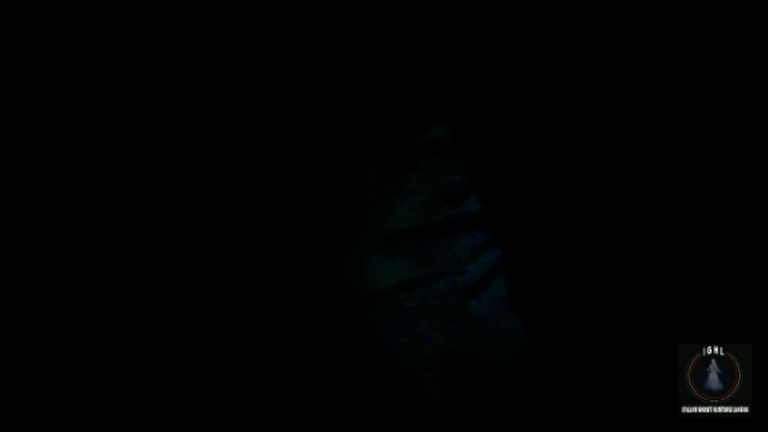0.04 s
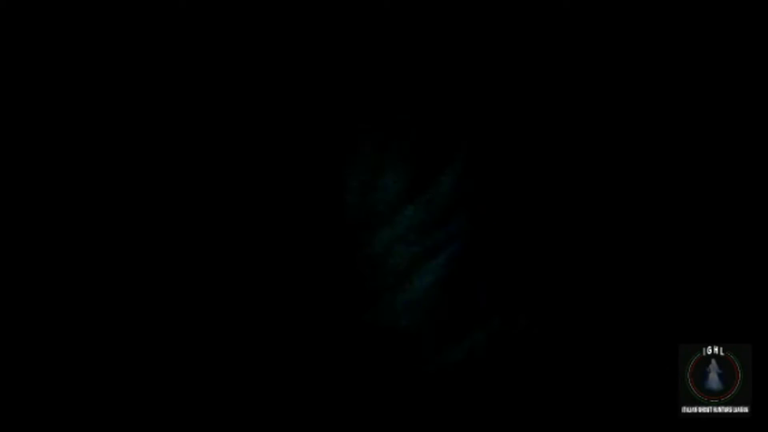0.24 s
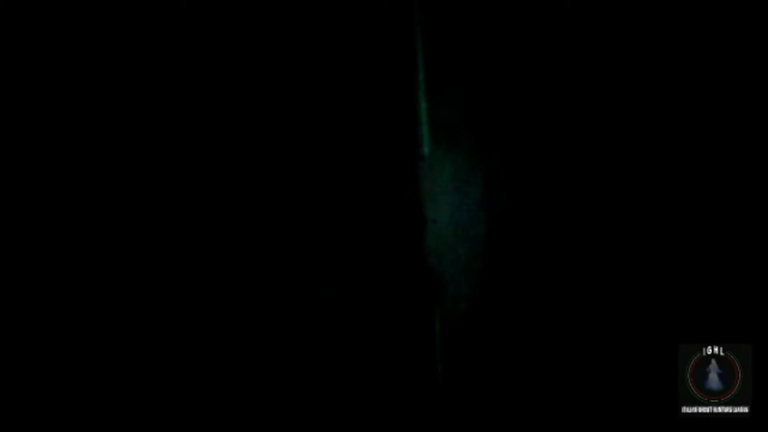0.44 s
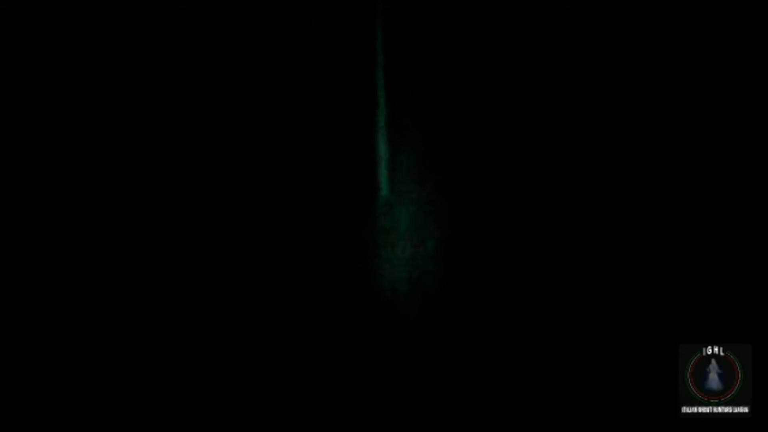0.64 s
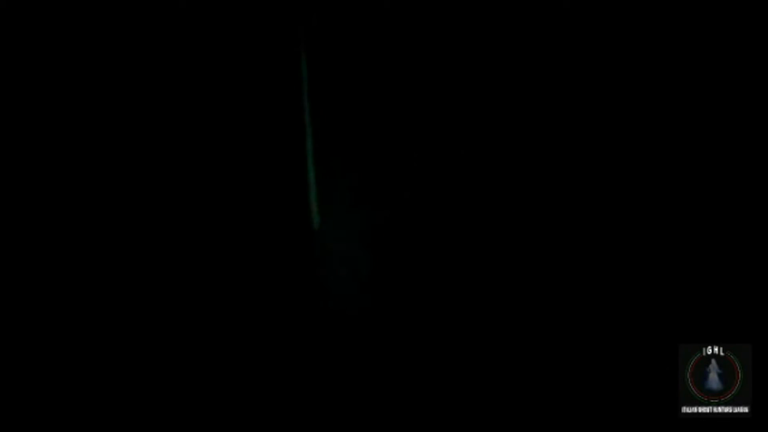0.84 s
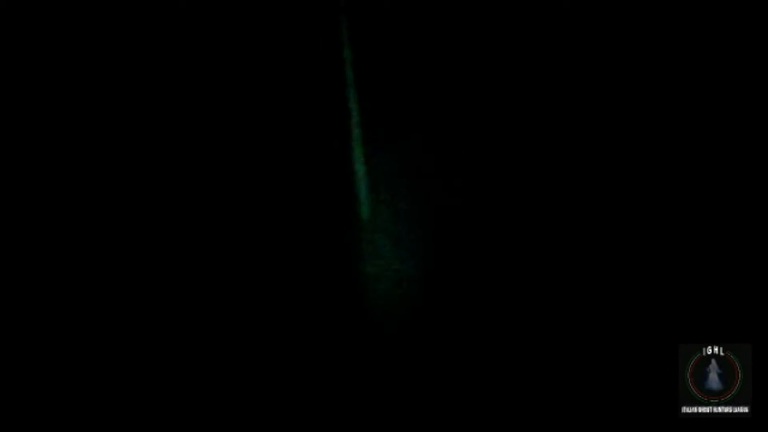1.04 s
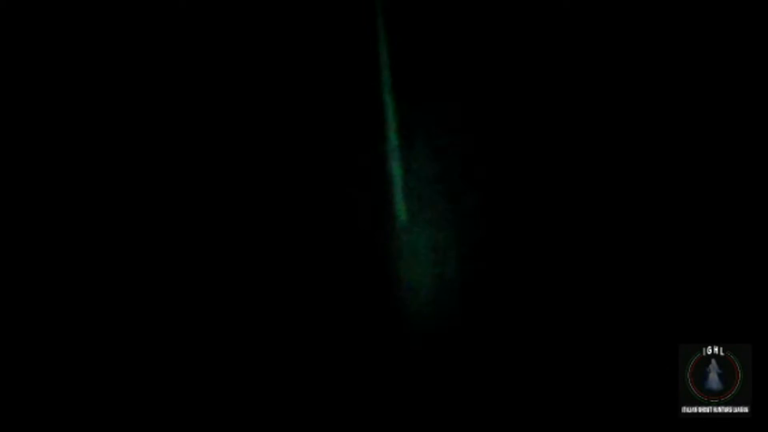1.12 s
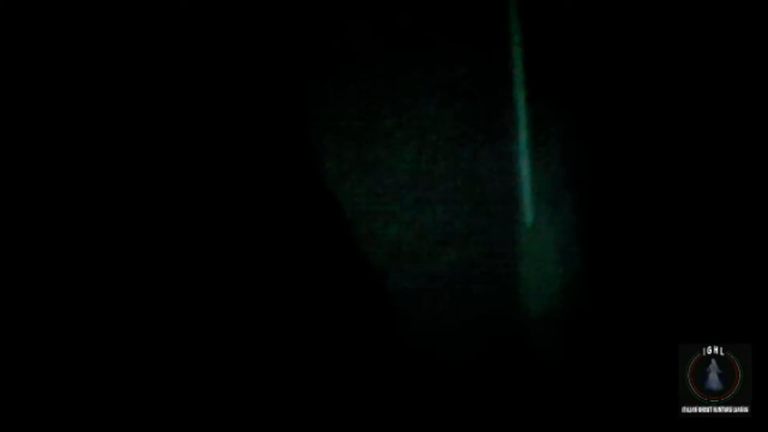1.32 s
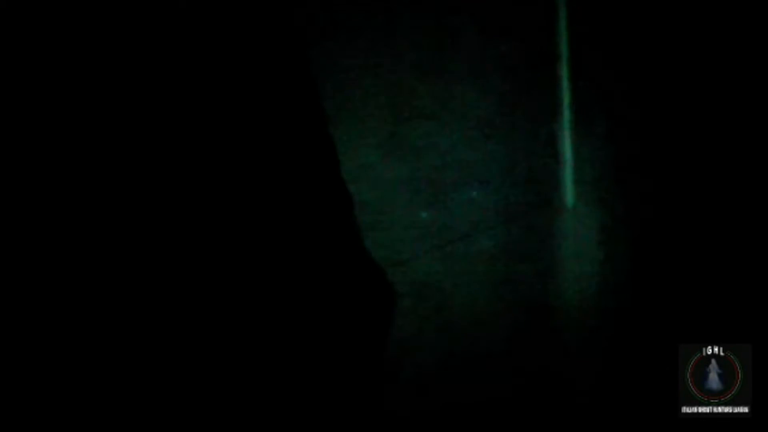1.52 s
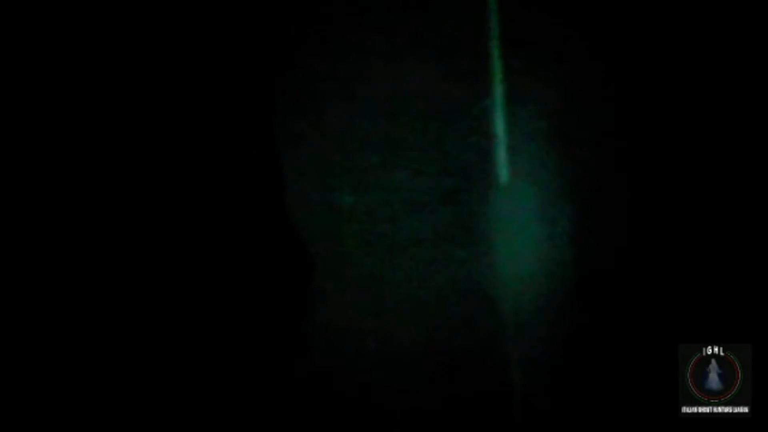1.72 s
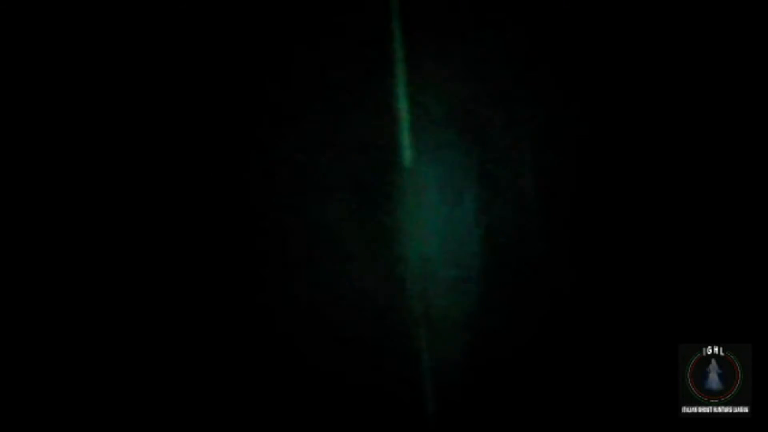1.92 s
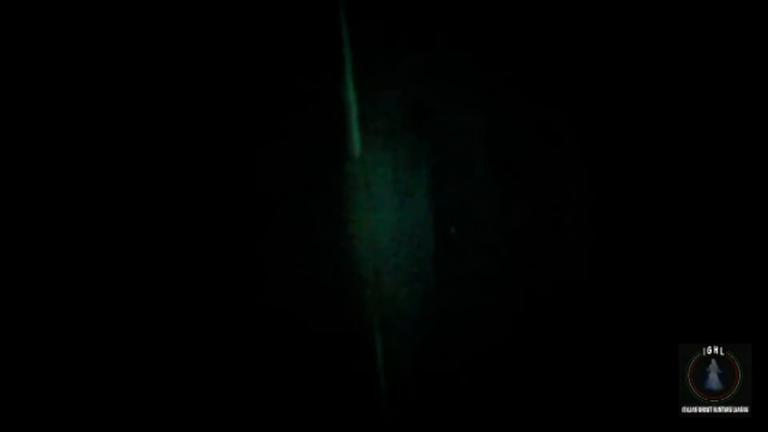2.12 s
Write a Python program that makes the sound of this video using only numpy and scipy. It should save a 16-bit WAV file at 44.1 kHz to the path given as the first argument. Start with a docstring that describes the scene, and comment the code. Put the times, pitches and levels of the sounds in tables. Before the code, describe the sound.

Camera handling noise, heard from inside the body: rapid irregular dead plastic knocks, brighter and harder at first, then softer and duller, with hand rubbing, tiny ticks and low rumble; very close, dry, nearly mono.

```python
"""Within the shell of a handheld camera: the grip makes the housing give small, dead knocks, hard and bright
at first, then softer, each a damped resonance with a faint, brief high tone cluster.
Between them the hand rubs over the shell (coloured friction noise) and now and then catches with a tick.
The body carries these to the microphones, dry and nearly mono, over low grip rumble and very faint hiss."""
import sys
import numpy as np
from scipy import signal
from scipy.fft import rfft, irfft, next_fast_len
from scipy.io import wavfile
from scipy.ndimage import map_coordinates

SR = 44100
rng = np.random.default_rng(int(sys.argv[2]) if len(sys.argv) > 2 else 0)


def transcribe(u):
    """Save the signal u as a 16-bit wav file named by the first command-line argument.

    u: samples, shape (n,) or (channels, n), limited to [-1, 1]; the rate is SR.
    q: integer samples, one column per channel.
    """
    v = np.clip(np.atleast_2d(u).T, -1, 1)
    q = np.round(v * 32767).astype(np.int16)
    wavfile.write(sys.argv[1], SR, q)


N = 94815


def amp(db):
    """Amplitude ratio: 20 dB is a factor of ten."""
    return 10 ** (np.asarray(db) / 20)


def unit(x):
    """Normalisation to an rms of 1."""
    return x / np.sqrt(np.mean(x ** 2) + 1e-20)


def along(points, hz):
    """Spectral envelope: (f/Hz, level/dB) points interpolated over log frequency."""
    f, level_db = np.transpose(points)
    return np.interp(np.log(hz + 1), np.log(f + 1), level_db)


def filtered(x, response):
    """Linear filtering: the spectrum of x is multiplied by a response of frequency."""
    size = next_fast_len(N + SR // 2)
    spectrum = rfft(x, size) * response(np.fft.rfftfreq(size, 1 / SR))
    return irfft(spectrum, size)[..., :N]


def wobble(rate):
    """Band-limited fluctuation: a spline through random knots, rate of them a second."""
    knots = rng.standard_normal(int(N * rate / SR) + 4)
    return map_coordinates(knots, [np.arange(N) * rate / SR])


def hiss():
    """Stationary noise: the steady floor of the microphones is white noise with a fixed colour."""
    # spectral density of the hiss, relative: f/Hz, level/dB
    colour = [(30, -20), (250, -21.5), (650, -1), (1150, 1), (2000, -15.5), (4000, -17.5), (8000, -21),
              (15000, -23.5)]
    level_db = -84.5
    noise = filtered(rng.standard_normal(N), lambda hz: amp(along(colour, hz)))
    return amp(level_db) * unit(noise)


def rub_levels():
    """Amplitude modulation: the strokes' level in three bands, in dB per sample before later gains."""
    # strokes of the hand: t/s, level of lows/dB, level of mids/dB, level of treble/dB
    strokes = [(0, -90, -69.5, -86), (0.071, -83, -79, -93), (0.101, -69, -61.5, -82),
               (.135, -66, -62, -68.5), (.165, -77, -68, -69.5), (.205, -68, -63.5, -68.5),
               (0.235, -64, -56.5, -56.5), (.276, -70.5, -64, -56.5), (.32, -66, -58.5, -61.5),
               (.36, -69.5, -62.5, -61.5), (.41, -65, -58.5, -65.5), (.51, -62, -58.5, -57),
               (.55, -67, -56, -64.5), (.64, -60, -56, -57), (.695, -63, -53.5, -58),
               (.72, -58, -57.5, -54), (0.781, -66.5, -62.5, -63.5), (.835, -75, -73.5, -76),
               (0.881, -72, -67, -74), (0.905, -53, -56, -55.5), (.944, -65.5, -71.5, -75),
               (.98, -71, -66, -71), (1.1, -72, -74, -85), (1.16, -71.5, -68, -84),
               (1.262, -81, -70, -79.5), (1.283, -73, -69, -67.5), (1.304, -69, -58.5, -56.5),
               (1.35, -75, -64.5, -69.5), (1.41, -62.5, -65.5, -70.5), (1.44, -72, -83, -84),
               (1.475, -72.5, -73, -95), (1.505, -65.5, -73, -72.5), (1.602, -71, -70.5, -87),
               (1.68, -92, -85, -99), (1.77, -79.5, -71.5, -92), (1.81, -66.5, -60.5, -72.5),
               (1.86, -71, -62.5, -71), (1.889, -67.5, -59.5, -62.5), (1.991, -65, -61, -67.5),
               (2.06, -83, -80, -90.5), (2.15, -92, -80.5, -101)]
    s, *columns = np.transpose(strokes)
    return [np.interp(np.arange(N) / SR, s, db) for db in columns]


def rumble():
    """Incoherent sources: the shifting grip stirs each microphone with low noise of its own."""
    # spectral density of the rumble, relative: f/Hz, level/dB
    colour = [(30, -3), (130, 0.5), (250, -4), (600, -34.5), (2000, -70.5)]
    level_db = -32.5  # relative to the tabled lows of the rubbing
    noise = filtered(rng.standard_normal((2, N)), lambda hz: amp(along(colour, hz)))
    return amp(level_db + rub_levels()[0]) * unit(noise)


def friction():
    """Stick-slip: dense tiny slips and smooth sliding noise excite the shell, which colours them; rms 1."""
    # spectral density of the rubbing, relative: f/Hz, level/dB
    colour = [(30, -28.5), (170, -29), (350, -10.5), (650, 2.5), (850, 0), (1150, 4.5), (1600, -0.5),
              (2100, -4.5), (2800, -16.5), (3300, -27), (3700, -40), (4200, -42.5), (4650, -30.5),
              (6000, -29), (7000, -32.5), (7600, -46.5), (8300, -46), (8900, -36.5), (10000, -33.5),
              (11200, -46), (12300, -44), (13800, -38.5), (16000, -56.5)]
    slips_per_s, slip_spread_db = 700, 4.5
    slips_db = -1  # relative to the smooth noise
    happens = rng.random(N) < slips_per_s / SR
    strength = amp(slip_spread_db * rng.standard_normal(N))
    slips = happens * strength * rng.choice([-1, 1], N)
    drive = amp(slips_db) * unit(slips) + rng.standard_normal(N)
    return unit(filtered(drive, lambda hz: amp(along(colour, hz))))


def rubbing():
    """Modulated friction: uneven strokes of the hand set the level of each band, hence the brightness."""
    lows_edge_hz, treble_edge_hz = 693, 1427
    gain_db, flutter_db, flutter_knots_per_s = -3, 3, 59.99
    slide = friction()
    lows = filtered(slide, lambda hz: 1 / (1 + (hz / lows_edge_hz) ** 6))
    below_treble = filtered(slide, lambda hz: 1 / (1 + (hz / treble_edge_hz) ** 6))
    bands = [lows, below_treble - lows, slide - below_treble]
    strokes = sum(amp(db) * unit(band) for db, band in zip(rub_levels(), bands))
    return amp(gain_db + flutter_db * wobble(flutter_knots_per_s)) * strokes


def ticks():
    """Transient excitation: the skin catches and lets go, a brief, rough ping without bass."""
    # catches of the skin: t/s, level/dB (envelope peak before the low cut), f/Hz
    catches = [(0.264, -43, 2310), (0.9558, -51.5, 1220), (1.4858, -48.5, 1730), (1.9619, -40, 1520),
               (1.9781, -47.5, 2510)]
    attack_s, decay_s, low_cut_hz = 0.0006, 0.00088, 800
    noise_db = 0  # rms of the roughness relative to the peak of the sine
    out = np.zeros(N)
    rough = amp(noise_db) * friction()
    for s, db, hz in catches:
        t = np.maximum(np.arange(N) / SR - s, 0)
        envelope = (1 - np.exp(-t / attack_s)) ** 2 * np.exp(-t / decay_s)
        ping = np.sin(2 * np.pi * hz * t) + rough
        out += amp(db) * envelope / envelope.max() * ping
    low_cut = signal.butter(2, low_cut_hz, "highpass", fs=SR, output="sos")
    return signal.sosfilt(low_cut, out)


def thud(dullness, pitch_hz, bass_db, size=4096):
    """Minimum-phase impulse response: the housing answers one contact; its main resonance peaks at 1."""
    # the housing's answer to a hard knock at its usual pitch, relative: f/Hz, level/dB
    housing = [(30, -46.5), (150, -35.5), (300, -24), (400, -15.5), (520, -2.5), (610, 3), (700, 0.5),
               (820, -9), (950, -6), (1090, 1.5), (1330, -9), (1600, -7), (2150, -10.5), (2600, -30.5),
               (2900, -23), (3900, -50), (5800, -30.5), (7900, -56.5), (9700, -36), (11700, -56),
               (13500, -43), (16000, -56.5)]
    usual_pitch_hz, main_below_hz, bass_below_hz = 621.8, 864, 500
    dull_from_hz, dull_to_hz = 587, 2400  # a soft contact darkens progressively over this range
    hz = np.fft.rfftfreq(size, 1 / SR)
    octaves = np.log2(np.clip(hz, dull_from_hz, dull_to_hz) / dull_from_hz)
    colour_db = along(housing, hz * usual_pitch_hz / pitch_hz) - dullness * octaves
    colour_db += bass_db / (1 + (hz / bass_below_hz) ** 6)
    # folding the cepstrum onto positive times makes the response causal
    fold = 1 + np.sign(size // 2 - np.arange(size))
    fold[0] = 1
    cepstrum = irfft(np.log(amp(colour_db)))
    spectrum = np.exp(rfft(cepstrum * fold))
    main_resonance = irfft(spectrum * (hz < main_below_hz))
    return irfft(spectrum) / np.abs(signal.hilbert(main_resonance)).max()


def high_tones(t):
    """Additive superposition: faint high sines of random phase decay together."""
    # high sines of the cluster, relative: f/Hz, level/dB
    sines = [(3300, -2), (4550, -1.5), (5000, -5.5), (7200, -8.5), (8450, -5.5), (8950, -9.5),
             (11050, -9.5), (12350, -9.5), (13500, -13.5), (14980, -12)]
    t60_s, attack_s, scatter_db = 0.021, 0.00079, 2
    cluster = np.zeros(len(t))
    for hz, db in sines:
        level = amp(db + rng.normal(0, scatter_db))
        cluster += level * np.sin(2 * np.pi * (hz * t + rng.random()))
    # T60 is the time to fall by 60 dB, a factor of 1000
    return cluster * np.exp(-np.log(1000) * t / t60_s) * (1 - np.exp(-t / attack_s))


def knocks():
    """Impact excitation: each contact gives a few cycles of the damped housing, with a trace of high tones."""
    # contacts: t/s, level of the main resonance/dB, dullness/(dB per octave), f/Hz (pitch), extra bass/dB
    contacts = [(0.064, -58.5, 16, 595, -6), (0.1143, -25, 6, 616, -11.5), (0.1812, -49.5, 22, 580, 9.5),
                (0.2136, -29, 8, 614, 2.5), (0.2816, -26, 1.5, 613.5, 0.5), (0.3586, -42.5, 17, 603, -4),
                (0.432, -28.5, 7.5, 623, -1.5), (0.4924, -20, -0.5, 626.6, -2), (0.5286, -44.5, 2, 576, 11),
                (0.563, -35, 5, 610, 2.5), (0.6188, -34.5, 8.5, 640, -1), (0.6817, -40.5, 9.5, 653, 10),
                (0.708, -35.5, 3.5, 629, -0.5), (0.749, -39.5, 10, 616, -5), (0.8217, -41.5, 11, 603, 1.5),
                (0.862, -48.5, 14, 584, -3), (0.895, -23.5, 19.5, 625, 3), (0.93, -53, 8, 640, 10),
                (0.999, -55, 19, 640, 1), (1.0469, -46.5, 14, 633, -15), (1.1223, -37.5, 14, 610, -3),
                (1.1703, -41, 13.5, 590, -1.5), (1.238, -48.5, 16, 592, 1), (1.29, -36.5, 17, 623, 1),
                (1.3653, -45, 17, 607, -3.5), (1.3855, -39.5, 8, 618, 5), (1.4536, -46.5, 35, 632, -13),
                (1.4922, -37, 14, 642, 2), (1.524, -49, 15, 640, -5), (1.5548, -40.5, 12.5, 623, -2),
                (1.6109, -53, 17, 580, 4), (1.7821, -41, 21.5, 650, -5.5), (2.0019, -47.5, 20, 622, -5)]
    tones_db = -31  # relative to the main resonance
    out = np.zeros(N + SR)
    for s, db, dullness, pitch_hz, bass_db in contacts:
        body = thud(dullness, pitch_hz, bass_db)
        t = np.arange(len(body)) / SR
        out[round(s * SR):][:len(t)] += amp(db) * (body + amp(tones_db) * high_tones(t))
    return out[:N]


def scene():
    """Coherence: knocks, rubbing, ticks and hiss are almost alike in both channels; only rumble is independent."""
    # difference between the channels, side relative to mid: f/Hz, level/dB
    width = [(40, -17.5), (130, -10), (350, -24.5), (800, -26), (1300, -24.5), (2500, -14.5), (6000, -13.5),
             (12000, -10)]
    mid = rubbing() + ticks() + hiss() - knocks()
    side = filtered(mid, lambda hz: 1j * amp(along(width, hz)))  # a quarter cycle from mid
    return np.array([mid - side, mid + side]) + rumble()


def record(dry):
    """Band limitation: the camera keeps nothing from its upper limit on."""
    top_hz = 16000
    return filtered(dry, lambda hz: hz < top_hz)


dry = scene()
out = record(dry)
transcribe(out)
```